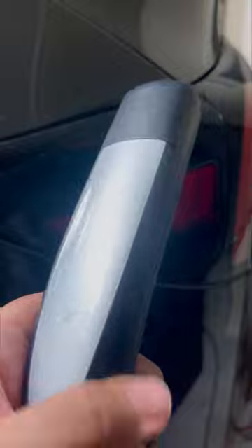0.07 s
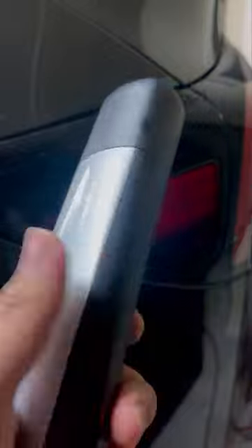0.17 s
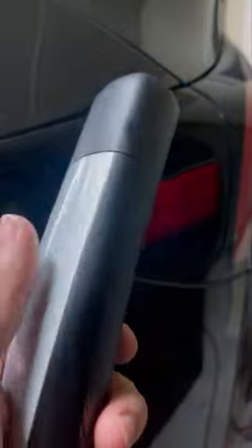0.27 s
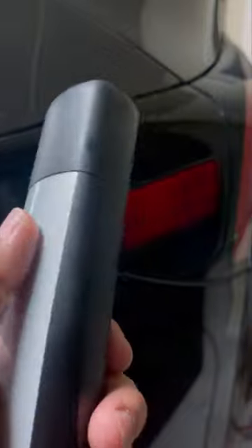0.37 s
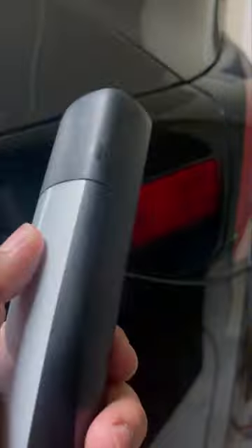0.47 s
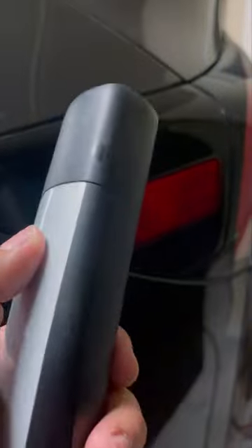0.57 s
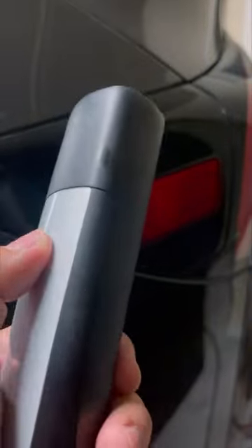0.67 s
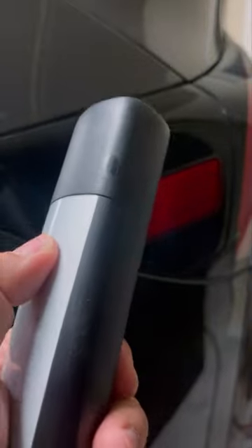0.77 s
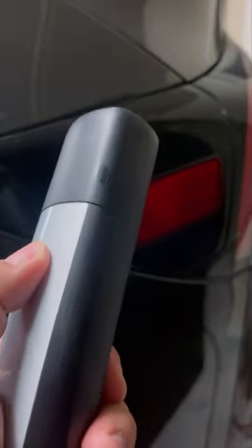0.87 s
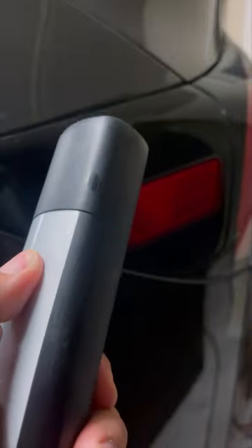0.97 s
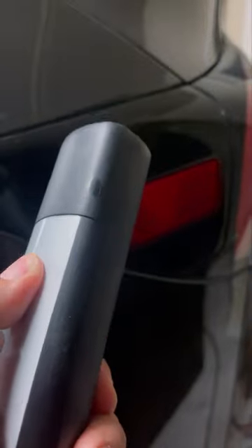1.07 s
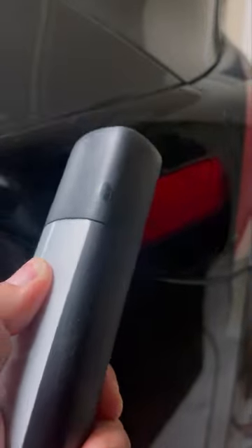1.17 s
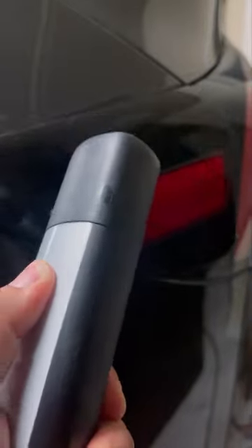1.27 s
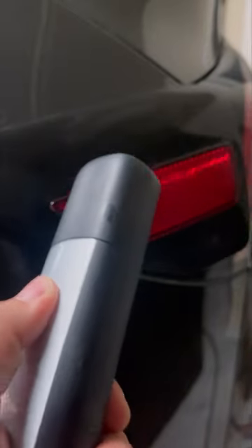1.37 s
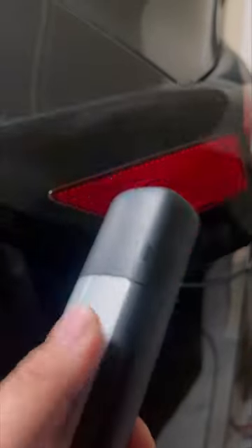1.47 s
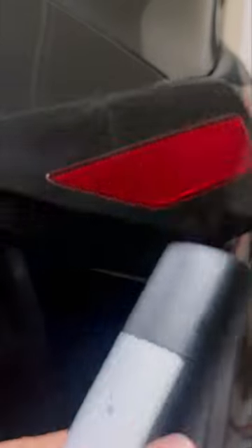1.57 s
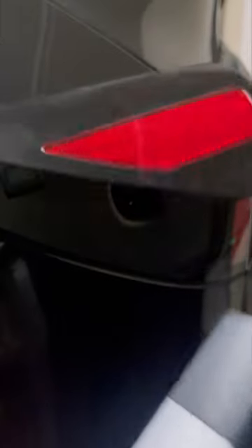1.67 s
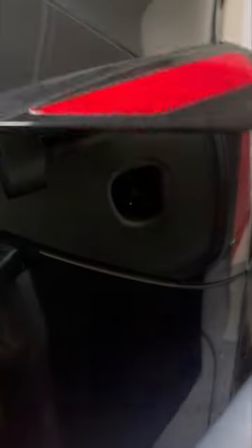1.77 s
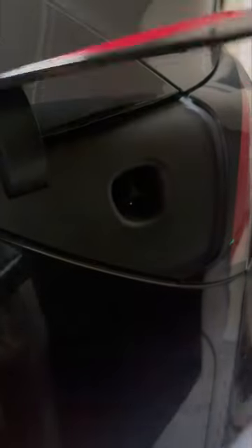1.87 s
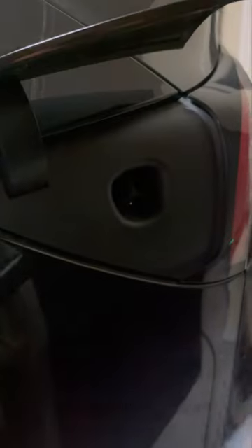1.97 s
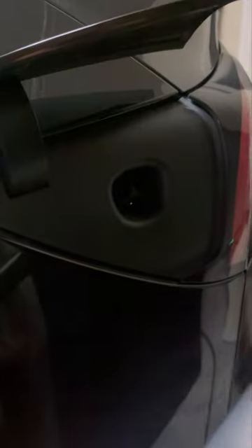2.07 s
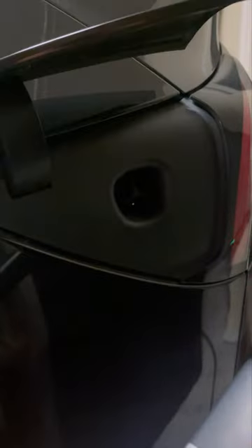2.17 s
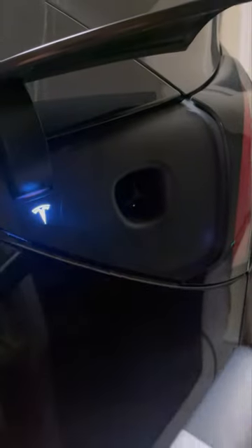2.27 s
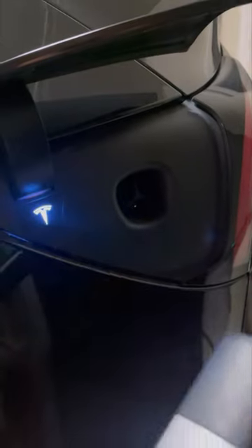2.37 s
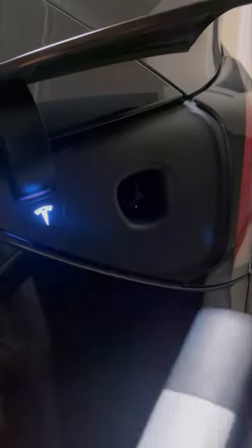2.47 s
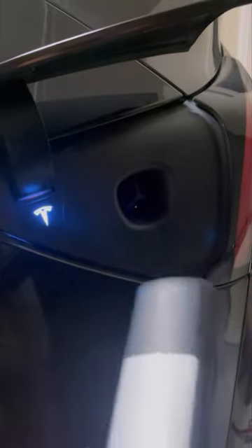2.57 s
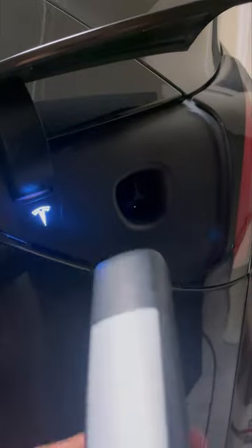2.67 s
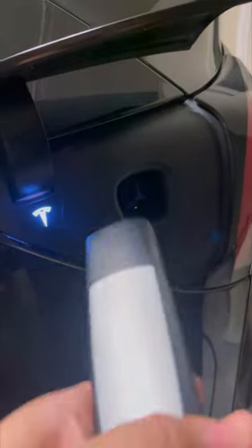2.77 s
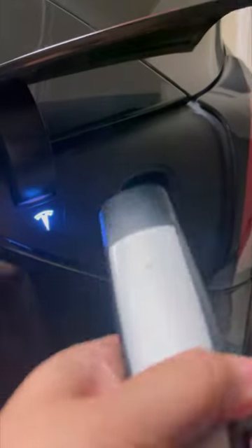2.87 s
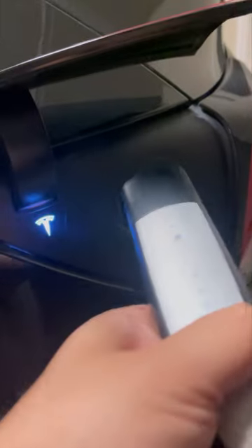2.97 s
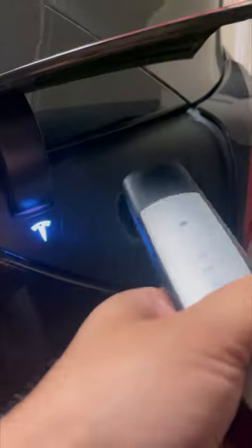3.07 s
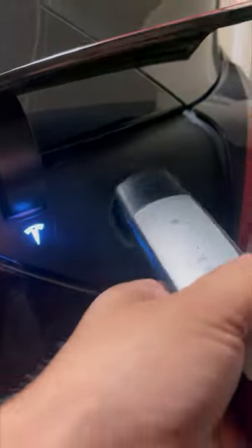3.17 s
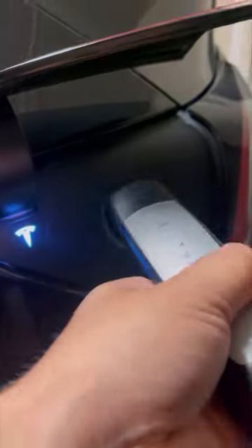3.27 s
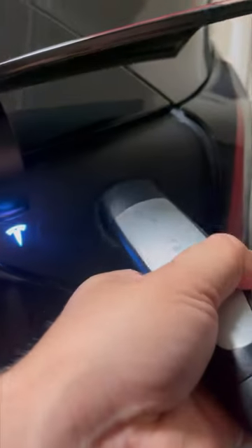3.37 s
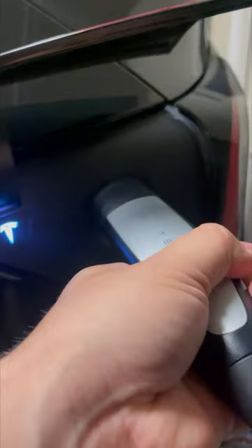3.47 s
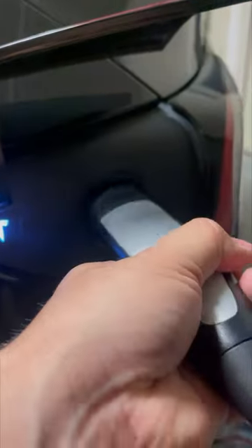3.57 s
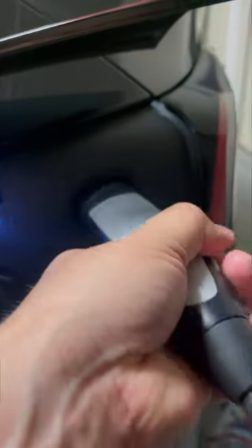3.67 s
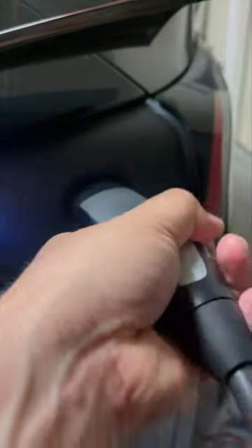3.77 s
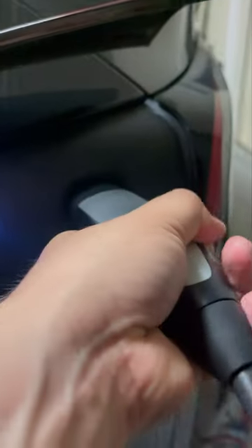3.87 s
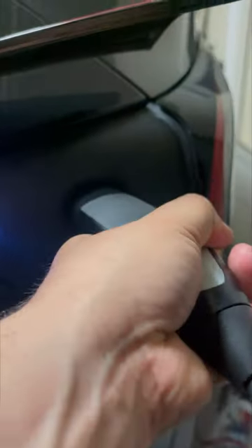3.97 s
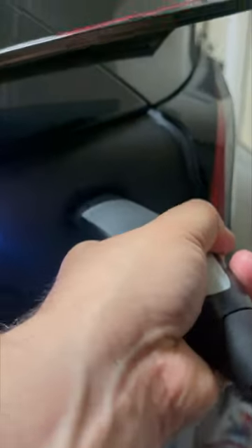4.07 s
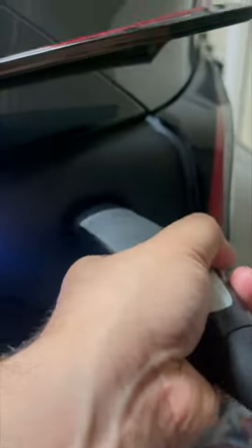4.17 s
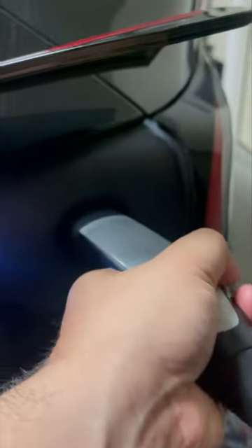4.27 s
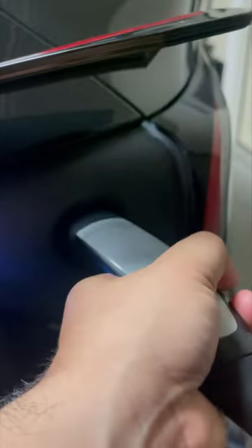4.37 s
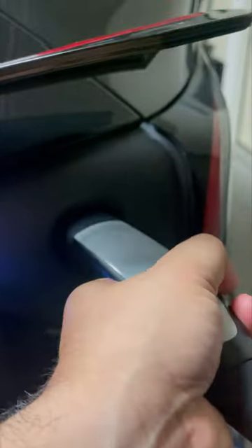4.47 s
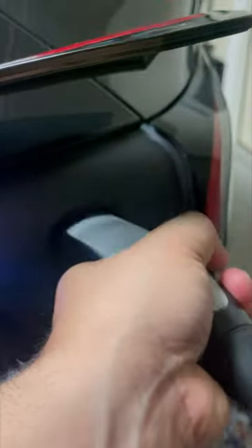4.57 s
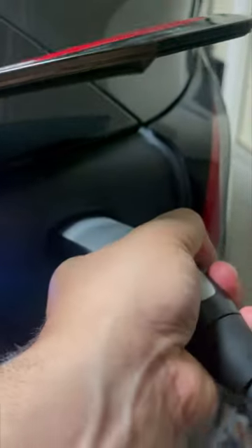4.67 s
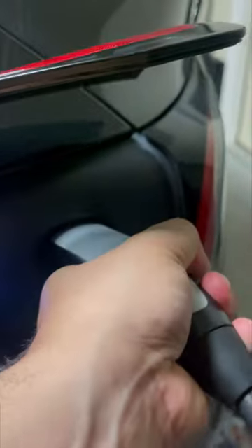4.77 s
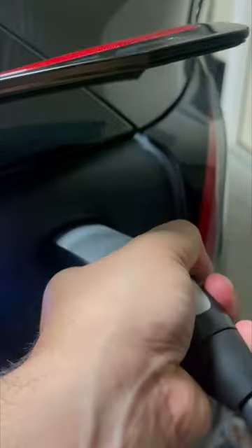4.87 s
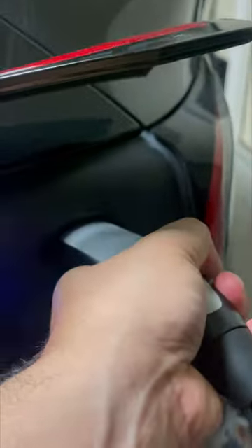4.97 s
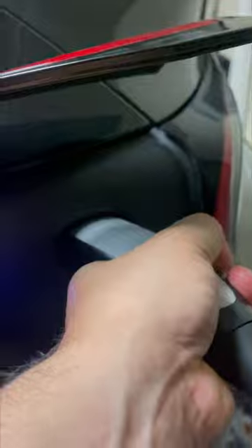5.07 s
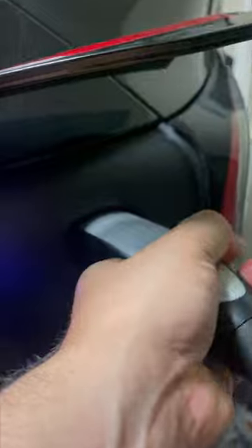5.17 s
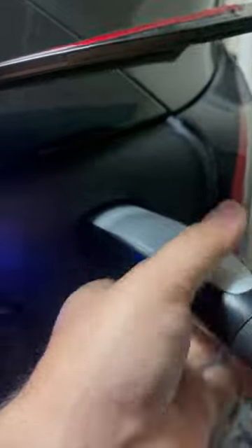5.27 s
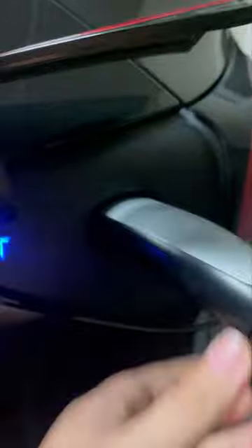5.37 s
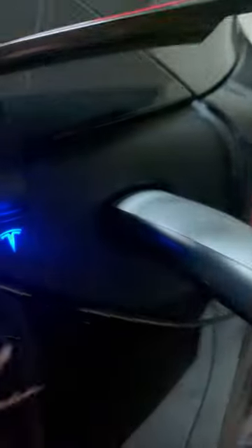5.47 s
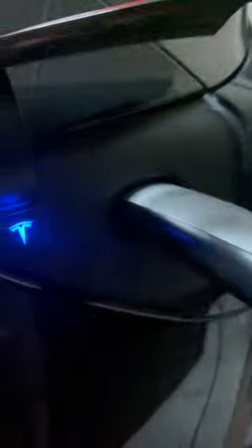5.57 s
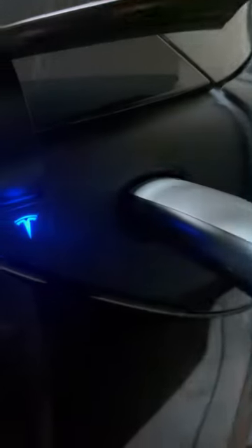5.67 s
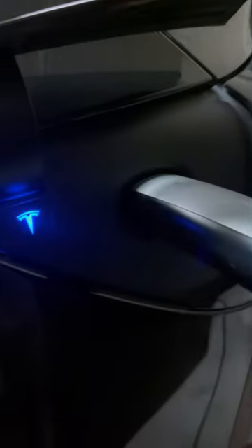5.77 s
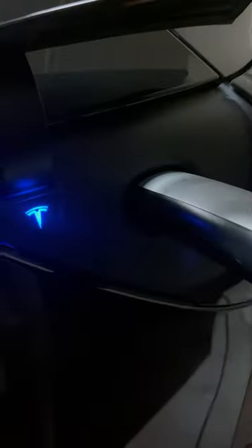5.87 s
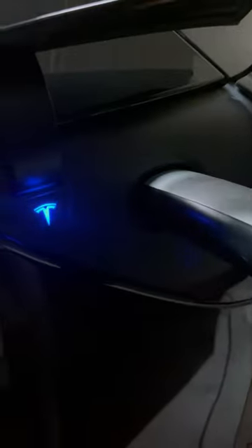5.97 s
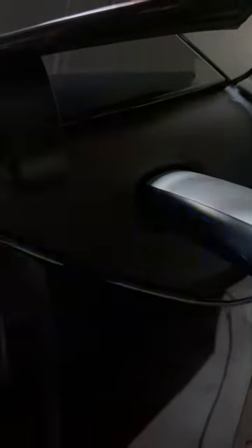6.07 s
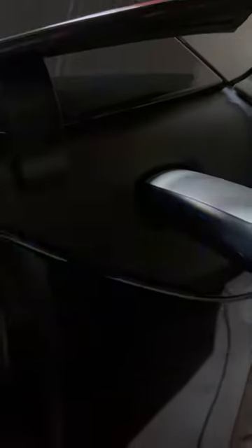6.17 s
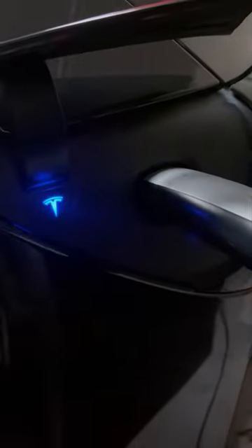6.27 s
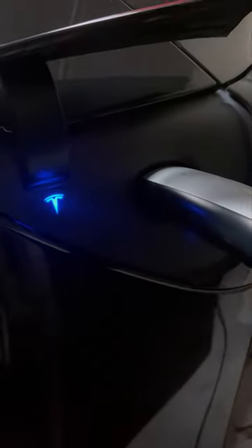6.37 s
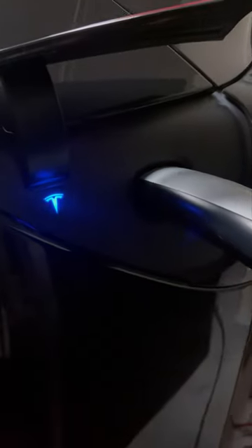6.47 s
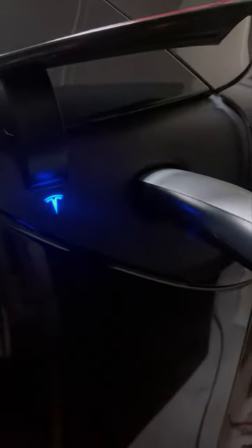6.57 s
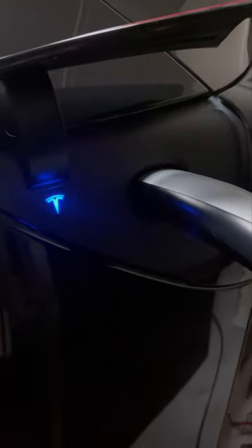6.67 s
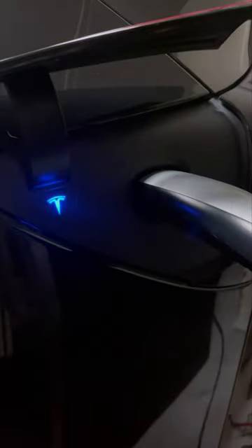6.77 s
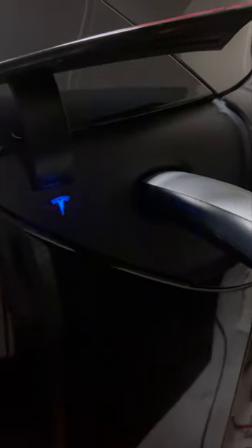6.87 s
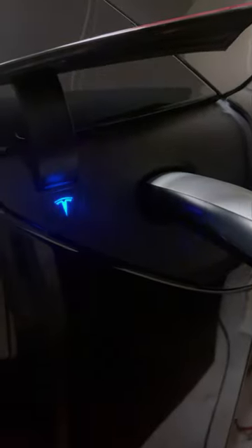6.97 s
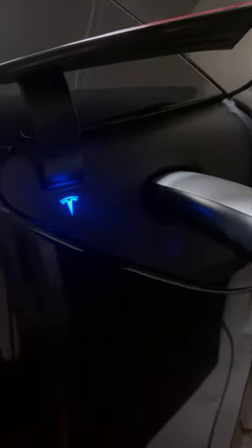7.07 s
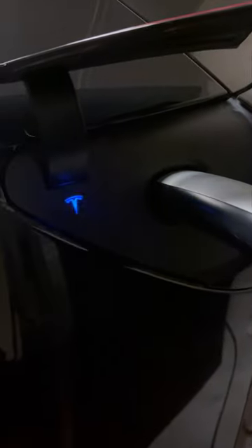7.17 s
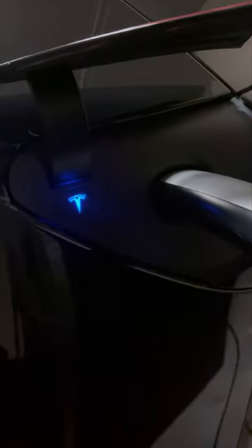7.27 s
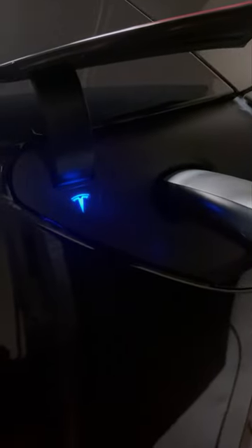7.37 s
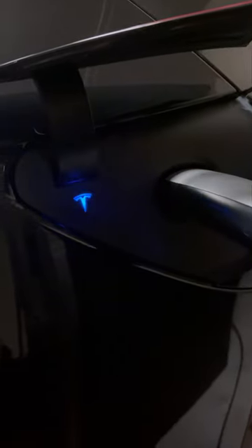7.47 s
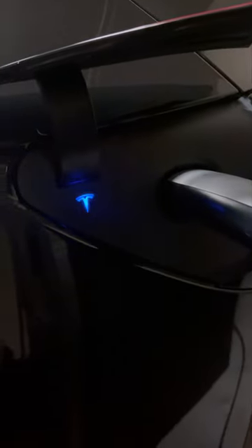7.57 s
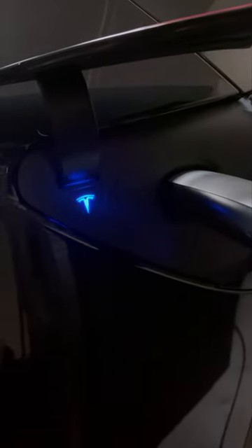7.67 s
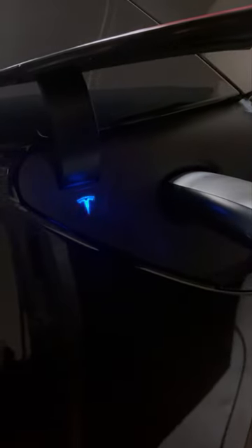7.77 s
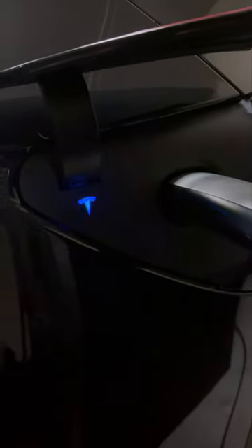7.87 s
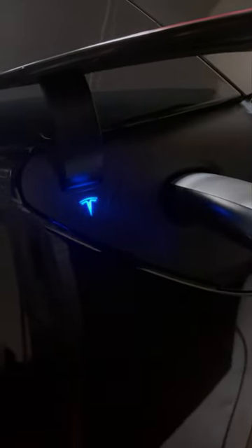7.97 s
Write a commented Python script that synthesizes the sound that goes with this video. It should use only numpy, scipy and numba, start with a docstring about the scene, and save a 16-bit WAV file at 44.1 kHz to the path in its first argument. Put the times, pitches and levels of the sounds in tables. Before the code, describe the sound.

A hand rubs a plastic charging plug, a small motor whirs a port door open, then the plug scrapes and clunks home over low garage hum.

```python
"""A hand shifts on a plastic charging plug in a humming garage: stick-slip noise swells with each stroke.
A latch and a small motor open the port door of a car: gear noise, rising whine and commutator buzz.
The plug knocks, scrapes and clunks home: panel modes, short ticks and slip noise; the latch locks.
Two relays clack far off as soft noise bursts. The hum is coloured noise, narrow resonances and tones.
A phone held close hears it through two ports."""
import sys
import numpy as np
from scipy import signal
from scipy.fft import rfft, irfft
from scipy.io import wavfile
from scipy.ndimage import uniform_filter1d
from numba import njit

SR = 44100
rng = np.random.default_rng(int(sys.argv[2]) if len(sys.argv) > 2 else 0)


def int16_out(signal):
    """Quantize to a 16-bit WAV file."""
    q = np.round(np.clip(np.atleast_2d(signal).T, -1, 1) * 32767)
    wavfile.write(sys.argv[1], SR, q.astype(np.int16))


def attenuation_scalar(level_db):
    """Turn a level in dB into a linear amplitude multiplier (20 dB per decade)."""
    decades = np.asarray(level_db, float) / 20
    return 10 ** decades


N = 353549
TIME = np.arange(N) / SR


def unit(x):
    """Scale to rms 1."""
    return x / np.sqrt(np.mean(x ** 2))


def colour(x, points):
    """Filter through (f/Hz, gain/dB) points, joined on a log frequency axis."""
    hz, db = np.transpose(points)
    bins = np.fft.rfftfreq(N, 1 / SR) + 1
    gain = attenuation_scalar(np.interp(np.log(bins), np.log(hz), db))
    return irfft(rfft(x) * gain, N)


def grains(rate, spread_db):
    """Stick-slip: sparse slips (rate per second) of very unequal size over a little smooth noise."""
    size = attenuation_scalar(spread_db * np.minimum(rng.exponential(size=N), 4.5))
    slips = (rng.random(N) < rate / SR) * size
    return rng.standard_normal(N) * (0.53 + slips)


def walk(rate):
    """Slow random drift around 0, spread near 1; rate in new values per second."""
    k = int(SR / rate)
    steps = np.repeat(rng.standard_normal(N // k + 1), k)
    return 2.0 * uniform_filter1d(uniform_filter1d(steps, k), k)[:N]


@njit
def svf(x, hz, width):
    """Band-pass with a moving centre, gain 1 there."""
    y, b, l = np.empty(len(x)), 0., 0.
    for i in range(len(x)):
        g, k = np.tan(np.pi * hz[i] / SR), width / hz[i]
        v = (b + g * (x[i] - l)) / (1 + g * (g + k))
        b, l, y[i] = 2 * v - b, l + 2 * g * v, k * v
    return y


def band(x, hz, width):
    """Band-pass with a fixed centre."""
    return svf(x, np.full(len(x), 1. * hz), 1. * width)


def stereo_band(x, hz, width):
    """The same fixed band-pass on both channels."""
    return np.array([band(ear, hz, width) for ear in x])


def add(out, s, sound):
    """Mix a short sound in at time s."""
    i = int(s * SR)
    out[..., i:i + sound.shape[-1]] += sound[..., :N - i]


def strokes(rows):
    """Gain of strokes that swell to a peak and die away; rise and fall are the times for 20 dB."""
    shape = 0.99  # 1 = pointed, 2 = rounded top
    out = np.zeros(N)
    t = TIME[:2 * SR] - 1
    for s, db, rise, fall in rows:
        distance = np.where(t < 0, -t / rise, t / fall)
        gain = attenuation_scalar(db - 20 * distance ** shape)
        skip = max(int((1 - s) * SR) + 1, 0)  # part ahead of time zero
        add(out, max(s - 1, 0), gain[skip:])
    return out


def two_layers(rows):
    """Gains of a main layer and of a second one that each stroke carries at its own share."""
    main = [row[:4] for row in rows]
    second = [(s, db + share_db, rise, fall) for s, db, rise, fall, share_db in rows]
    return strokes(main), strokes(second)


def hum():
    """Air noise, wavering machine resonances, a thin wandering whistle and a low tone that stops."""
    # air noise spectrum: (f/Hz, relative level/dB)
    air_colour = [(20, -26.5), (50, 5), (100, -8), (180, 4), (243, -12.5), (350, -5), (420, -14.5),
                  (630, -21), (1000, -33), (1600, -23.5), (2100, -40), (3000, -44), (3500, -57),
                  (4500, -61), (11000, -50.5), (13000, -80)]
    # narrow machine resonances: (f/Hz, width/Hz, mean level/dB)
    resonances = [(58, 5.6, -70), (159.3, 2.7, -56), (194.1, 4.8, -58), (219, 3.7, -70), (286.1, 8.2, -63),
                  (372, 2.5, -66), (636.5, 5.7, -73.5), (1540, 50, -84), (2540, 180, -76.5)]
    tone_hz, tone_db, tone_off_s = 116.2, -56, 5.81
    whistle_hz, whistle_db, whistle_wander = 2535, -74, .004

    noise = rng.standard_normal((2, N))
    air = attenuation_scalar(-46 + 0.7 * walk(4.21)) * unit(colour(noise, air_colour))
    lines = np.zeros((2, N))
    for hz, width, db in resonances:
        line = unit(stereo_band(rng.standard_normal((2, N)), hz, width))
        lines += attenuation_scalar(db + 0.5 * walk(3.1)) * line
    whistle_phase = 2 * np.pi * np.cumsum(whistle_hz * (1 + whistle_wander * walk(30))) / SR
    whistle = attenuation_scalar(whistle_db + 1.5 * walk(40)) * np.sin(whistle_phase)
    on = np.clip((tone_off_s - TIME) / 0.013, 0, 1)
    tone = on * attenuation_scalar(tone_db + 2 * walk(3.46)) * np.sin(2 * np.pi * tone_hz * TIME)
    return air + lines + whistle + tone


def rub():
    """Fingers and sleeve on smooth plastic: stick-slip hiss, with a darker body when the grip is firm."""
    # one row a stroke: (peak t/s, hiss level before the final lift/dB, rise/s, fall/s, body re hiss/dB)
    rub_strokes = [(0.08, -63, 0.042, 0.14, -10), (0.25, -65.5, 0.021, 0.088, -18),
                   (0.335, -54, 0.071, 0.053, -16.5), (0.62, -69.5, .02, 0.078, -14),
                   (0.905, -81, .01, 0.069, -4), (1.36, -68, .02, 0.17, -9),
                   (1.436, -64.5, 0.0066, 0.013, 0), (1.46, -74.5, 0.032, 0.35, -10),
                   (2.0, -89, 0.0089, 0.051, 22), (2.52, -70.5, 0.082, 0.16, -12.5),
                   (2.636, -76, 0.025, 0.031, -14), (2.77, -64, 0.077, 0.18, -0.5),
                   (2.85, -59, 0.15, 0.095, 2.5), (3.0, -86.5, 0.14, 0.46, 5.5), (5.13, -91, 0.18, 0.12, 8),
                   (5.25, -77, 0.058, .06, -4), (5.4, -83.5, 0.68, 0.68, 4.5),
                   (5.856, -78, 0.12, 0.053, -1)]
    # spectrum of the skin hiss: (f/Hz, relative level/dB)
    hiss_colour = [(2500, -21.5), (4000, -14), (5500, -9.5), (7400, -3.5), (9300, -2), (10900, 1),
                   (11900, -11), (13000, -31)]
    # spectrum of the darker body: (f/Hz, relative level/dB)
    body_colour = [(410, -42), (700, -10), (869, -1), (1440, 2), (2620, 7.5), (3830, 0), (5000, 4),
                   (6000, -10.5), (7800, -40), (13200, -120)]

    hiss_gain, body_gain = two_layers(rub_strokes)
    hiss = unit(colour(grains(1300, 2.6), hiss_colour))
    body = unit(colour(grains(1500, 1.5), body_colour))
    return attenuation_scalar(6.0) * (hiss_gain * hiss + body_gain * body)  # final lift


def ticks():
    """Each tick is a short ring at its own pitch, the shell's modes, and a much shorter bright snap."""
    # hard ticks: (t/s, ring peak level/dB, ring f/Hz, snap re ring/dB)
    hard_ticks = [(0.075, -56, 1570, 8), (0.507, -57.5, 850, 12), (0.8955, -49, 3000, 12),
                  (0.8934, -35.5, 2660, 9), (0.989, -66, 2500, 15), (1.108, -47.5, 1440, 8.5),
                  (1.118, -44, 1400, -5), (1.127, -34.5, 2350, 3), (1.154, -32, 2330, -4.5),
                  (1.3393, -45, 3070, 19.5), (1.338, -26.5, 2780, 8.5), (1.99, -42.5, 790, -31.5),
                  (1.993, -41.5, 3160, -24.5), (2.195, -42.5, 1320, -23), (2.2055, -39, 3300, -30),
                  (2.206, -32, 1640, -34), (2.214, -30.5, 1580, -28), (2.241, -39, 3400, -25),
                  (2.245, -26.5, 1340, -33.5), (2.258, -43, 1900, -32), (2.339, -40, 2960, -23),
                  (2.589, -49, 596, -30), (3.4582, -20.5, 850, -12.5), (3.5145, -31.5, 840, -23),
                  (3.531, -38, 875, -19), (3.589, -43.5, 850, -25), (3.686, -34, 2800, -20),
                  (3.696, -27.5, 845, 3), (3.816, -45.5, 2650, 4), (3.984, -48, 1020, -16.5),
                  (4.051, -56, 790, -30), (4.195, -53.5, 805, -10), (4.316, -58, 810, 5.5),
                  (4.495, -39.5, 900, -9), (4.573, -43, 2200, 10), (4.634, -28, 2470, -13),
                  (4.652, -17.5, 820, -9), (4.786, -30, 1523, -8), (5.127, -52, 1540, -20),
                  (5.211, -51, 2640, 7), (5.226, -54, 896, 5.5), (5.237, -56, 2540, -6),
                  (6.7, -62, 3100, -20)]
    # shell of the struck parts, varied a little by each tick: (f/Hz, relative level/dB, longest t60/s)
    shell_modes = [(1300, -3, 0.019), (2005, 0.5, 0.025), (2930, -1, 0.021), (3600, -13, 0.027),
                   (4240, -6, 0.017), (5990, -1, .018), (6400, -27, 0.013)]
    low_t60_s, damped_hz = 0.031, 1860  # higher rings die sooner
    shell_db = -7  # shell peak re ring peak

    out, t = np.zeros(N), TIME[:SR // 8]
    for s, db, hz, snap_db in hard_ticks:
        t60 = low_t60_s / (1 + (hz / damped_hz) ** 3)
        fall_db = -60 * t / np.clip(t60, .003, .12)
        noise = rng.standard_normal((2, len(t)))
        ring = band(band(noise[0] * attenuation_scalar(fall_db), hz, 0.27 * hz), hz, 3.7 * hz)
        snap = band(noise[1] * attenuation_scalar(3.3 * fall_db), 9500, 7000)
        shell = np.zeros(len(t))
        for mode_hz, mode_db, mode_t60 in shell_modes:
            level_chance, pitch_chance = rng.standard_normal(2)
            envelope = attenuation_scalar(mode_db + 2 * level_chance - 60 * t / min(mode_t60, 2 * t60))
            shell += envelope * np.sin(2 * np.pi * mode_hz * (1 + 0.053 * pitch_chance) * t)
        tick = ring / np.abs(ring).max()
        tick += attenuation_scalar(shell_db) * shell / np.abs(shell).max()
        tick += attenuation_scalar(snap_db) * snap / np.abs(snap).max()
        add(out, s, attenuation_scalar(db) * tick)
    return out


def panel_ring():
    """Ring of the body panel after one short push; each mode takes about a cycle to build."""
    # modes of the rear body panel: (f/Hz, relative level/dB, t60/s)
    modes = [(125.4, -10, 0.15), (148, -9, 0.16), (176.7, -5.5, 0.12), (204, -10.5, 0.052),
             (217.6, 7, 0.043), (265.6, -6, 0.11), (329.2, -15, 0.12), (385.2, -22, 0.23), (476, -9, 0.064),
             (547, -14, 0.064), (703, -15.5, 0.05), (840, -16.5, 0.053), (982, -28.5, 0.04)]
    build_cycles = 1.36
    t = TIME[:SR // 2]
    ring = np.zeros(len(t))
    for hz, db, t60 in modes:
        build = 1 - np.exp(-t * hz / build_cycles)
        ring += attenuation_scalar(db - 60 * t / t60) * build * np.sin(2 * np.pi * hz * t)
    return ring


def panel():
    """Knocks and the shaking of hand and latch ring the same panel; knocks also sway the whole body."""
    # blows into the panel: (t/s, peak level/dB, contact/ms, sway level before its envelope/dB)
    knocks = [(1.135, -30.5, 0.56, -50), (1.155, -30.5, 0.99, -30.5), (1.162, -36, 0.67, -50),
              (1.179, -26.5, 2.4, -46), (2.214, -33, 0.62, -58), (2.252, -27.5, 0.49, -54),
              (2.588, -44, 0.51, -47), (3.465, -18, 2.1, -29), (3.519, -21.5, 0.95, -41),
              (3.529, -24, 1.2, -46), (3.589, -27.5, 0.2, -50), (3.691, -24.5, 1.5, -39),
              (3.698, -14.5, 2.3, -52), (3.739, -24.5, 1.85, -38), (3.905, -30, 2.5, -39),
              (3.995, -24.5, 2.3, -29), (4.049, -40, 3.4, -47), (4.504, -22, 2.3, -32.5),
              (4.593, -23.5, 3.5, -35), (4.655, -15.5, 0.32, -36), (4.6596, -2, 1.55, -22),
              (4.675, -15.5, 0.87, -31.5), (4.697, -18, 0.39, -37), (4.712, -22, 1.5, -49),
              (4.733, -23, 1.2, -51), (4.748, -24, 1.56, -50), (4.758, -24.5, 1.4, -50)]
    # hand and latch shaking the panel: (peak t/s, level/dB, rise/s, fall/s)
    shoves = [(1.175, -38, 0.11, 0.098), (1.3, -54, 0.061, 0.13), (2.21, -46.5, 0.027, 0.13),
              (2.274, -43, 0.076, 0.056), (2.34, -48, 0.025, 0.11), (3.49, -58, 0.044, .06),
              (3.53, -42, .02, 0.09), (3.6, -40, 0.055, 0.11), (3.69, -40, 0.046, 0.11),
              (3.8, -44, 0.22, 0.18), (3.91, -60, 0.027, .1), (3.985, -42.5, 0.067, 0.16),
              (4.49, -39, 0.0082, 0.046), (4.559, -36, 0.05, 0.018), (4.6, -52, .05, .05),
              (4.645, -37, .015, .02), (4.665, -26, .01, 0.036), (4.735, -32.5, 0.068, 0.051),
              (4.789, -70, 0.037, 0.026), (4.88, -57, 0.11, 0.067)]
    sway_hz, sway_t60_s, sway_rise_s = 59.8, 0.38, 0.025

    ring, out = panel_ring(), np.zeros(N)
    t = TIME[:len(ring)]
    sway_envelope = (1 - np.exp(-t / sway_rise_s)) * attenuation_scalar(-60 * t / sway_t60_s)
    sway = sway_envelope * np.sin(2 * np.pi * sway_hz * t)
    for s, db, ms, sway_db in knocks:
        add(out, s, attenuation_scalar(sway_db) * sway)
        push = np.hanning(int(np.clip(ms, .2, 8) * SR / 1000) + 3)  # softer contact, longer push
        blow = signal.fftconvolve(ring, push)
        add(out, s - .003, -attenuation_scalar(db) * blow / np.abs(blow).max())  # begins 3 ms ahead
    jolts = grains(300, 1.5)
    damped_ring = ring * attenuation_scalar(-60 * t / 0.24)  # the hand damps it while pushing
    shaking = unit(signal.fftconvolve(jolts, damped_ring)[:N])
    return out + strokes(shoves) * shaking


def latch():
    """Small gears grip, whine roughly up to speed, rattle home and rebound."""
    # drive strokes: (start t/s, home t/s, rattle at home/dB, mesh f at start/Hz, mesh f it heads for/Hz)
    drives = [(1.112, 1.148, -41.5, 910, 1520), (2.201, 2.247, -37.5, 1135, 1787),
              (4.742, 4.791, -39, 950, 1676)]
    # spectrum of the gear rattle: (f/Hz, relative level/dB)
    rattle_colour = [(300, -14), (600, 9), (1600, 2), (3200, -1), (5000, -0.5), (7600, -14.5), (9000, -49),
                     (11000, -48), (13000, -69)]
    # whine partials: (multiple of the gear mesh rate, mean level/dB)
    partials = [(1, 0.5), (2, -7), (3, -10.5), (4, -17)]
    grip_db, rise_s, fall_s = -12, 0.014, 0.029  # first grip re home; times for 20 dB
    rebound_s, rebound_db, rebound_fall_s = 0.081, -17.5, 0.038  # after home, re home, time for 20 dB
    ring_hz, spin_up_s, whine_db = 2224, 0.025, -11  # whine re rattle at home

    rows, hz, running = [], np.zeros(N), np.zeros(N)
    for start, home, db, start_hz, full_hz in drives:
        rows.append((start + rise_s / 2, db + grip_db, rise_s, 2 * (home - start)))
        rows.append((home, db, rise_s, fall_s))
        rows.append((home + rebound_s, db + rebound_db, rise_s, rebound_fall_s))
        on = (TIME > start) * (TIME < home)
        hz += on * (full_hz - (full_hz - start_hz) * np.exp(-np.abs(TIME - start) / spin_up_s))
        running += on * attenuation_scalar(db + whine_db)
    teeth = grains(490, 3.5)
    whine = np.zeros(N)
    for k, db in partials:
        partial = unit(svf(teeth, k * hz + 1, 200.) * (hz > 0))
        whine += attenuation_scalar(db + 3.0 * walk(150)) * partial
    whine *= np.sqrt(np.mean(hz > 0))  # level counted over the running time alone
    rattle = unit(colour(teeth, rattle_colour)) + 0.5 * unit(band(teeth, ring_hz, 190))
    return strokes(rows) * rattle + uniform_filter1d(running, size=300) * whine


def door():
    """A wavering commutator buzz and gear noise; both light up where they cross the housing resonances."""
    # door motor: (t/s, mean commutator rate f/Hz, effort level/dB, buzz re effort/dB)
    motor = [(1.25, 200, -67, -12), (1.321, 211.6, -57.5, -12), (1.449, 223.7, -58, -2),
             (1.55, 234.9, -55, -4.5), (1.632, 241.5, -54, 2.5), (1.68, 257, -54, 6.5),
             (1.72, 275.2, -51, -4), (1.76, 290.7, -50, -9), (1.83, 299.4, -49.5, -0.5),
             (1.88, 306.3, -48.5, -4), (1.92, 299.7, -52, -4), (1.95, 293, -68.5, -6), (1.98, 292, -68, 8)]
    # buzz partials: (multiple of the commutator rate, mean level/dB)
    partials = [(2, -4), (3, 3), (3.5, -10), (4, 5), (4.5, -8), (5, -6), (5.5, -8), (6, 0), (6.5, -6),
                (7, -2), (7.5, -6), (8, 4), (8.5, -3), (9, -2), (10, -3), (10.5, -6)]
    # spectrum of the gear noise: (f/Hz, relative level/dB)
    gear_colour = [(300, -4.5), (600, -10), (1190, -7), (1620, -7.5), (2410, -3), (3420, -22),
                   (4600, -14.5), (7000, -24), (9000, -37), (11000, -37), (13000, -46.5)]
    # housing resonances: (f/Hz, width/Hz, level/dB)
    housing = [(820, 20, -0.5), (921, 58, -8.5), (1200, 120, -4.5), (1714, 110, -20), (1886, 70, -3),
               (2354, 140, -12), (2540, 240, -8.5)]

    s, speed_hz, effort_db, buzz_db = np.transpose(motor)
    gate = uniform_filter1d(1. * (TIME > s[0]) * (TIME < s[-1]), size=300)
    speed = np.interp(TIME, s, speed_hz) * (1 + 0.0021 * walk(59.7))
    phase = 2 * np.pi * np.cumsum(speed) / SR
    buzz = sum(attenuation_scalar(db + 1.9 * walk(12)) * np.sin(k * phase) for k, db in partials)
    gears = unit(colour(grains(2200, 3.6), gear_colour)) * (1 + 0.29 * np.sin(phase))
    drive = attenuation_scalar(np.interp(TIME, s, buzz_db)) * buzz + attenuation_scalar(-10.0) * gears
    ringing = sum(attenuation_scalar(db) * band(drive, hz, width) for hz, width, db in housing)
    return gate * attenuation_scalar(np.interp(TIME, s, effort_db)) * (ringing + attenuation_scalar(-0.5) * gears)


def slide():
    """The plug slips in its socket: plastic scrapes on plastic and rings its shell, contacts hiss."""
    # one row a slip: (peak t/s, scrape level/dB, rise/s, fall/s, contact hiss re scrape/dB)
    scrapes = [(3.468, -47.5, 0.019, 0.05, -14), (3.519, -45.5, .006, 0.07, -13),
               (3.59, -74, .015, 0.025, -23), (3.67, -45.5, 0.058, 0.041, -12),
               (3.702, -39, 0.026, 0.016, -8), (3.74, -59, .03, 0.2, -8), (3.815, -66, .01, 0.037, -2),
               (3.985, -46, 0.015, 0.025, -13.5), (4.495, -59.5, 0.016, 0.015, -4),
               (4.559, -47.5, 0.046, 0.0065, -8), (4.58, -58.5, 0.015, 0.012, 7),
               (4.635, -35.5, 0.058, 0.03, -9), (4.655, -29.5, 0.012, 0.026, -18),
               (4.7, -70, 0.039, 0.089, 3), (4.789, -37.5, 0.011, 0.017, -3)]
    # spectrum of plastic on plastic: (f/Hz, relative level/dB)
    scrape_colour = [(300, 10), (500, 8.5), (900, 7.5), (1300, 1.5), (2400, -5), (3200, -19), (4500, -10.5),
                     (7000, -49)]
    # spectrum of the contact hiss: (f/Hz, relative level/dB)
    contact_colour = [(3500, -10), (5500, 0.5), (6500, 0.5), (8000, 0.5), (9300, -5), (11000, 3),
                      (12000, -40), (13200, -40)]
    # resonances of the plastic plug shell: (f/Hz, width/Hz, relative level/dB)
    plug_shell = [(820, 99, -4), (2350, 240, -9.5), (2780, 630, -5)]

    scrape_gain, hiss_gain = two_layers(scrapes)
    slips = grains(1800, 3.56)
    shell = sum(attenuation_scalar(db) * unit(band(slips, hz, width)) for hz, width, db in plug_shell)
    scrape = unit(colour(slips, scrape_colour)) + 0.25 * shell
    return scrape_gain * scrape + hiss_gain * unit(colour(slips, contact_colour))


def relays():
    """Heard mostly as their echo: a soft start, a noisy fall and two ringing parts, left and right unalike."""
    # relays deep in the car: (t/s, relative level/dB)
    clacks = [(7.170, -40.5), (7.3843, -40.5)]
    # spectrum of the noisy fall: (f/Hz, relative level/dB)
    clack_colour = [(700, -38), (1600, -8.5), (2200, -13), (3000, -5.5), (3450, 0), (4000, -11),
                    (5000, -14), (5800, -18), (7000, -8), (9300, -8), (10800, -6.5), (12000, -21),
                    (13100, -28)]
    # ringing parts: (f/Hz, width/Hz, level re noise/dB, t60/s)
    rings = [(3400, 200, -26, 0.16), (5630, 470, -10.5, 0.34)]
    t60_s, rise_s = 0.24, 0.0093

    out, t = np.zeros((2, N)), TIME[:SR // 2]
    for s, db in clacks:
        noise = rng.standard_normal((2, N))
        sound = attenuation_scalar(-60 * t / t60_s) * unit(colour(noise, clack_colour))[:, :len(t)]
        for hz, width, ring_db, ring_t60 in rings:
            ring = unit(stereo_band(noise[:, :len(t)], hz, width))
            sound = sound + attenuation_scalar(ring_db - 60 * t / ring_t60) * ring
        soft_start = 1 - np.exp(-t / rise_s)
        add(out, s - .004, soft_start * attenuation_scalar(db - 3.5) * sound)  # begins 4 ms ahead
    return out


def room(x):
    """Quick echoes off the car side, then the garage; different at each port, and the treble dies first."""
    late_t60_s, late_db, dull_hz = 0.47, -11, 3320
    early_t60_s, early_db = 0.049, -6.5
    early_low_hz = 355  # the quick echoes carry no deep bass

    t = TIME[:SR // 2]
    noise, quick = rng.standard_normal((2, 2, len(t)))
    dull = signal.lfilter(*signal.butter(1, dull_hz, fs=SR), noise)
    bright = noise - dull
    late = dull * attenuation_scalar(-60 * t / late_t60_s) + bright * attenuation_scalar(-60 * t / (0.34 * late_t60_s))
    late = late * (t > .004)
    early = signal.lfilter(*signal.butter(2, early_low_hz, "high", fs=SR), quick)
    early = early * attenuation_scalar(-60 * t / early_t60_s) * (t > .0005)
    echo = (attenuation_scalar(late_db) * unit(late) + attenuation_scalar(early_db) * unit(early)) / np.sqrt(len(t))
    return signal.fftconvolve(x[None], echo, axes=-1)[:, :N]


def scene():
    """Near sounds with their echo, and the far relays, over the hum."""
    near = rub() + ticks() + panel() + latch() + door() + slide()
    return near + room(near) + relays() + hum()


def roll_off(x):
    """The treble ends steeply here."""
    return signal.sosfilt(signal.butter(12, 13230, fs=SR, output="sos"), x)


def record(dry):
    """Two ports, most alike in the bass and near 9 kHz; treble leads in the left, both range ends are cut."""
    # difference between the ports: (f/Hz, gain on the side signal/dB)
    apart = [(60, -21), (200, -19), (400, -8.5), (700, 3.5), (1500, -4), (2500, 3.5), (3600, 5.5),
             (4700, 0.5), (6000, -5), (9000, -24.5), (13000, -6.5)]
    # phase by which the left port leads: (f/Hz, lead/rad)
    left_lead = [(3700, 0), (4800, np.pi), (5800, 2 * np.pi), (9350, 3 * np.pi), (12100, 4 * np.pi)]
    # balance of the ports: (f/Hz, left gain/dB)
    balance = [(100, 0.2), (500, 1.5), (1500, 0), (4000, -1)]
    low_hz, top_hz = 44.6, 12300
    dip_s, dip_len_s, dip_db = 5.818, .005, -15  # the level dips briefly

    mid = (dry[0] + dry[1]) / 2
    side = colour(dry[0] - dry[1], apart) / 2
    hz, turn = np.transpose(left_lead)
    half_lead = np.exp(.5j * np.interp(np.fft.rfftfreq(N, 1 / SR), hz, turn))
    left = irfft(rfft(colour(mid + side, balance)) * half_lead, N)
    right = irfft(rfft(mid - side) / half_lead, N)
    ports = np.array([left, right])
    ports = signal.lfilter(*signal.butter(2, low_hz, "high", fs=SR), ports)
    ports = signal.sosfilt(signal.butter(6, top_hz, fs=SR, output="sos"), ports)
    ports = ports * attenuation_scalar(dip_db * np.exp(-((TIME - dip_s) / dip_len_s) ** 2))
    return roll_off(ports)


dry = scene()
out = record(dry)
int16_out(out)
```